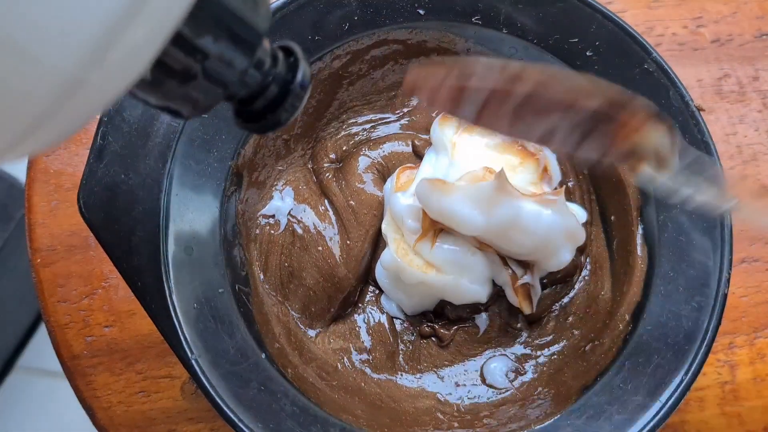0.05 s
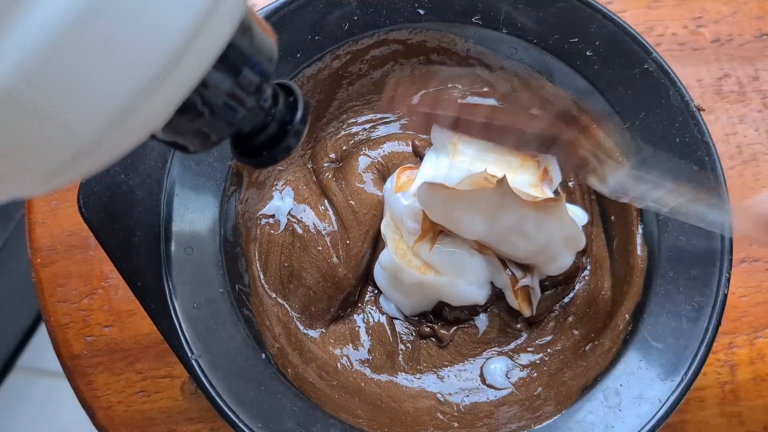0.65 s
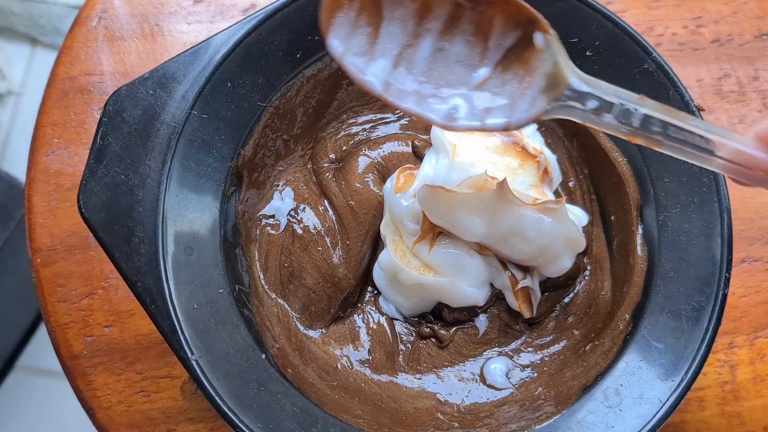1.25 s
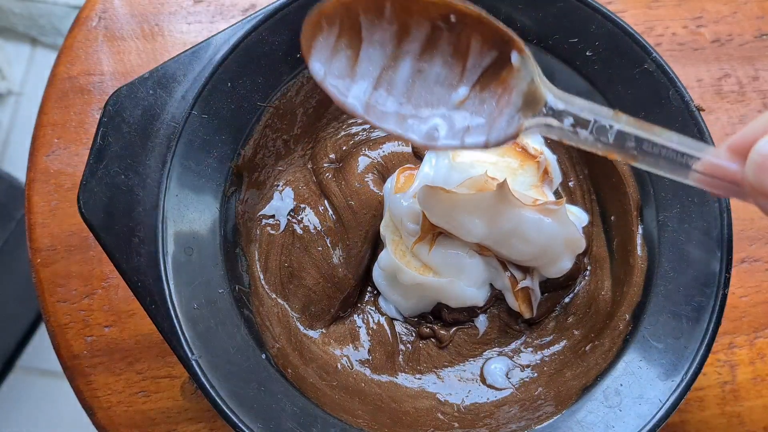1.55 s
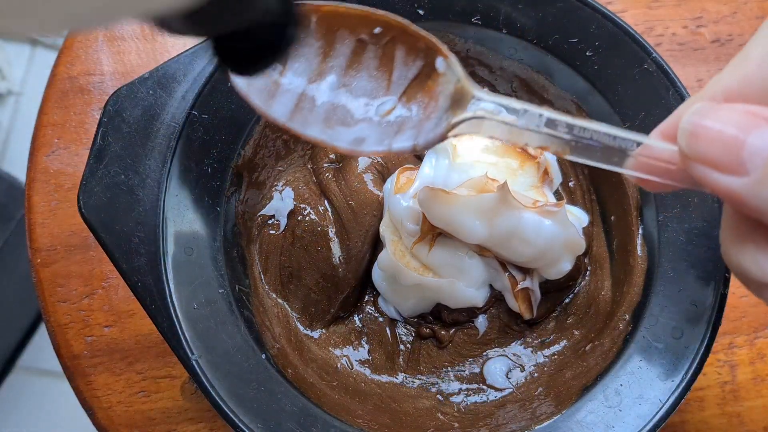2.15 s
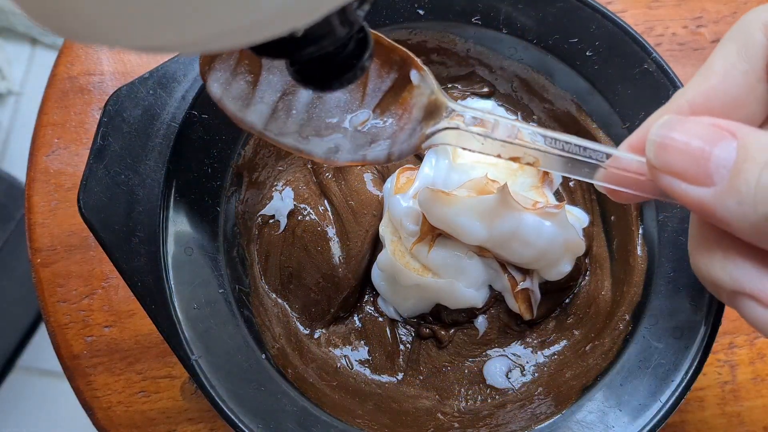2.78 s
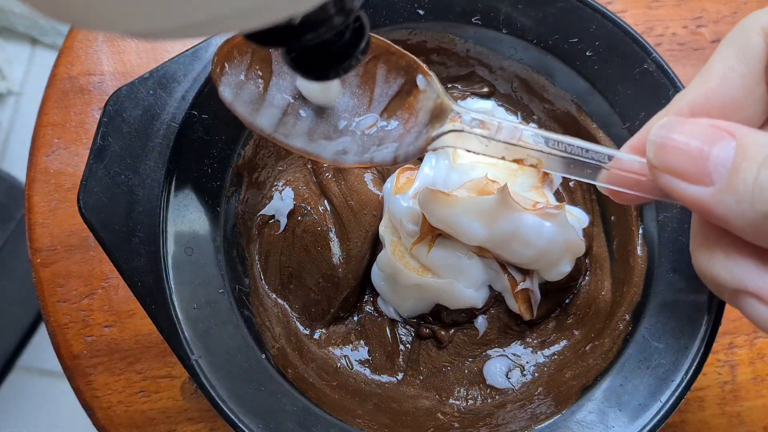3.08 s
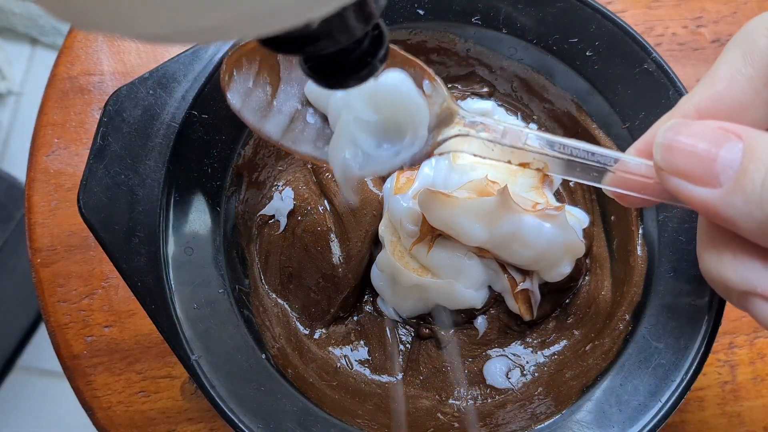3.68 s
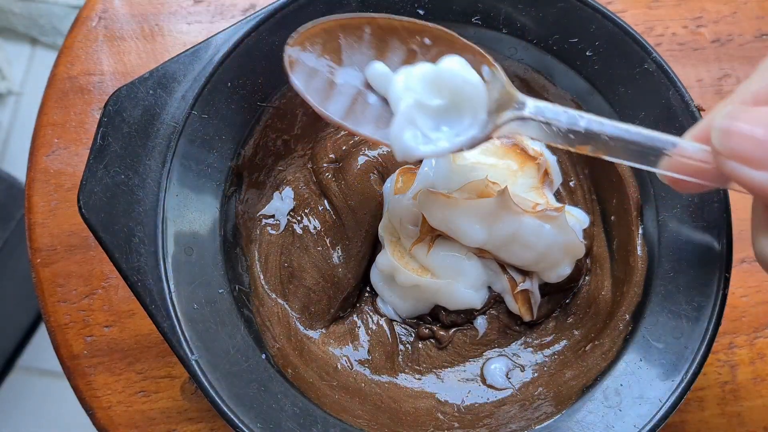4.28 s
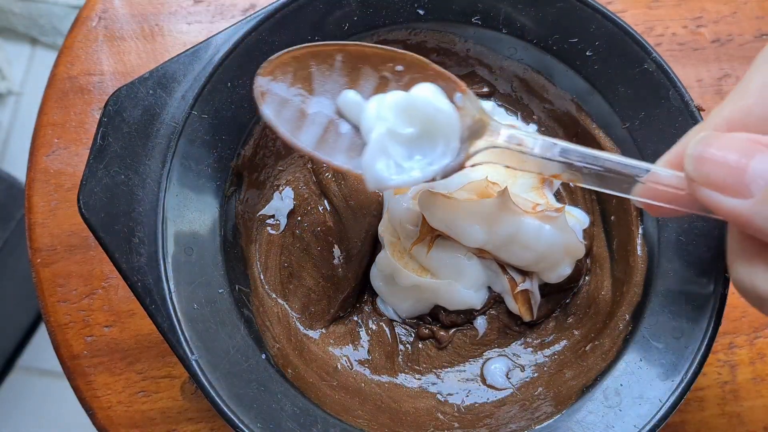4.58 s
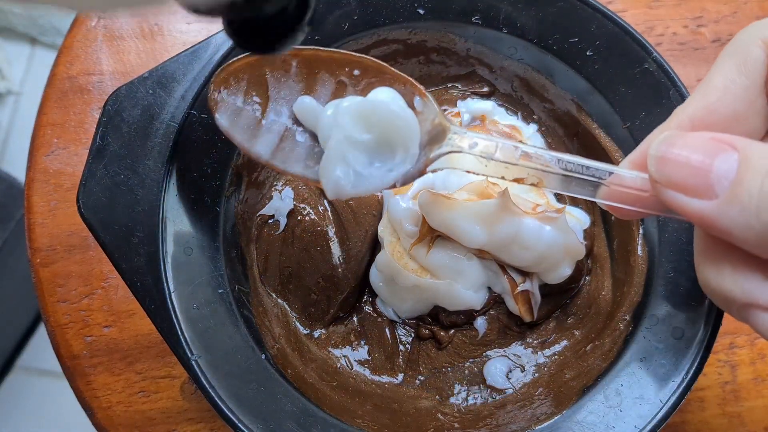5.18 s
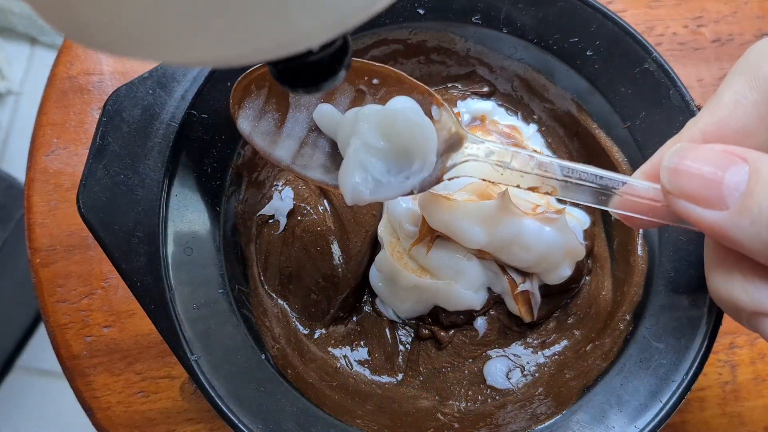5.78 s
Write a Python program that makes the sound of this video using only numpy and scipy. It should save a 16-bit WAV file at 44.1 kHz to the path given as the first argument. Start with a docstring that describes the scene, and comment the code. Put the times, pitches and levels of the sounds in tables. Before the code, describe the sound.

A plastic spoon clacks five times on a bowl, with soft low handling thumps. A nearly empty plastic bottle creaks as it is squeezed, fizzes briefly, then pops and splutters out air and cream. Released, it sucks air back in with a sinking whistle, and its dented wall snaps out. The microphones are close, in a small quiet room, with birds calling faintly outside.

```python
"""Five dry clacks of a plastic spoon on a bowl, then a nearly empty plastic bottle is squeezed over it.
The plastic creaks; the nozzle fizzes, pops and splutters air and cream, ringing the hollow bottle.
Let go, the bottle sucks air back in with a sinking whistle and its dented wall snaps out.
Soft handling thumps and wafts of air reach a close microphone pair in a small, quiet room,
and birds call faintly outside."""
import sys
import numpy as np
from scipy import signal
from scipy.fft import rfft, irfft
from scipy.io import wavfile
from scipy.ndimage import uniform_filter1d

SR = 44100
rng = np.random.default_rng(int(sys.argv[2]) if len(sys.argv) > 2 else 0)


def file_out(sig):
    """Save sig as 16-bit WAV at sys.argv[1]."""
    # one column per channel
    cols = np.atleast_2d(sig).T
    # limit, then scale
    lim = np.clip(cols, -1, 1)
    pcm = np.round(lim * 32767).astype(np.int16)
    wavfile.write(sys.argv[1], SR, pcm)


N = 261939
TIME, HZ = np.arange(N) / SR, np.fft.rfftfreq(N, 1 / SR)
RING = TIME[:SR // 5]  # time axis of one short hit, in seconds

# how alike rushing air is at the two microphones: freq_hz, correlation
AIR_LIKENESS = [(400, 0.68), (1500, 0.52), (4000, 0.343), (10000, 0.26)]


def spoon_taps(detune_spread=.02, contact_db=2.5, rebound_s=.0193):
    """Each tap is a dry clack that scatters around the bowl, knocks it and touches the rim again."""
    # taps on the rim: start_s, level_db, knock_db, rebound_relative_db
    taps = [(0.0444, -21, -28, -28), (0.2255, -22.5, -37.5, -17), (0.3992, -23.5, -39, -27),
            (0.5876, -25.5, -41, -15.5), (0.7544, -23.5, -38.5, -35)]
    # modes of the spoon: pitch_hz, gain_db, t60_s
    spoon_modes = [(1420, -4, .011), (1660, -1, .012), (1950, -10, .011), (2220, -18, 0.0068),
                   (2930, -17.5, 0.0098), (3300, -12, 0.011), (3880, -10, 0.0097), (5880, -9, 0.0097),
                   (7060, -12.5, .01), (7630, -12, 0.013), (11300, -21, 0.0077)]
    # low modes of the bowl: pitch_hz, gain_db, t60_s
    bowl_modes = [(371, -1, 0.057), (520, -14, .06), (860, -1, .035)]
    # the bowl rocks faintly on the table: start_s, level_db, pitch_hz
    rocks = [(0.071, -38, 1195), (0.78, -44.5, 1127)]
    out = np.zeros((2, N))
    attack = np.clip(RING / .00066, 0, 1)
    knock = np.clip(RING / .003, 0, 1) * ringing(bowl_modes)
    for start, db, knock_db, rebound_db in taps:
        detunes = 1 + detune_spread * rng.standard_normal(len(spoon_modes))
        trims = contact_db * rng.uniform(-.85, 1, len(spoon_modes))  # each tap lands on another spot
        modes = [(hz * detune, gain + trim, t60)
                 for (hz, gain, t60), detune, trim in zip(spoon_modes, detunes, trims)]
        ring = filtered(ringing(modes), 6, 1380, "high")  # so small a spoon radiates little bass
        scatter = amp(-26.5) * filtered(crack(t60=.093), 4, 8000, "low")
        add(out, start, amp(db) * attack * (ring + amp(-8) * crack(t60=.013) + scatter))
        add(out, start, amp(knock_db) * knock)
        add(out, start + rebound_s, amp(db + rebound_db) * (ring + amp(-12) * crack(t60=.025)))
    for start, db, hz in rocks:
        add(out, start, amp(db) * mode(hz, t60=.059))
    return pan(out, lead_ms=.423, left_db=3.5)


def cream_pops(cavity_db=-2):
    """Plugs of cream burst and ring the bottle: its air cavity, its wall and the narrow nozzle."""
    # bursting plugs: start_s, strength_db, crack_trim_db, nozzle_trim_db, wall_trim_db
    plugs = [(3.6428, -11.5, -9, -7, -1.5), (3.6439, -19, 0.5, -1, -4), (3.6462, -21.5, -7.5, -4, -1.5),
             (3.6502, -24, 8.5, -8.5, -3), (3.6535, -32, -5.5, 14, 0), (3.691, -17, -10, -14.5, -4),
             (3.696, -20.5, -6, -11.5, 2), (3.7004, -18.5, -3, -12, -1), (3.7098, -18.5, -0.5, -10, -2),
             (3.716, -14, -5.5, -12, -9), (3.7345, -25.5, -4, -12, -8), (3.7417, -24.5, -8, -14, -12),
             (3.9596, -36.5, -20, -34, -20)]
    # modes of the bottle: pitch_hz, gain_db, t60_s
    bottle_modes = [(400, -7, .03), (820, -7, .027), (1134, -2, 0.0199), (1430, -3, .028), (1837, -3, .035),
                    (2100, -2.5, 0.016), (2552, -4.5, .02), (3012, -3.5, .022), (4645, 0, .015)]
    out = np.zeros((2, N))
    for start, db, crack_db, nozzle_db, wall_db in plugs:
        tilt = [(420, cavity_db), (1100, 0), (2100, wall_db), (3000, wall_db), (4500, nozzle_db)]
        modes = [(hz, gain + curve_at(tilt, hz), t60) for hz, gain, t60 in bottle_modes]
        lip_squeak = amp(nozzle_db - 5) * mode(4600, t60=.016)
        ring = ringing(modes, polarity=-1) + lip_squeak
        add(out, start, amp(db) * (amp(-4) * ring + amp(crack_db - 5) * crack(t60=.0084)))
    escaping = filtered(out, 3, 330, "high")  # little escapes below the cavity's pitch
    return pan(escaping, lead_ms=.14, left_db=2)


def splutter(bursts_per_s=900, cream_full=.85, cream_left=.32, runs_out_s=3.717, drain_s=.014):
    """Films of cream burst in quick succession; as the cream runs out, hissing air takes over."""
    # spurts of cream and air: start_s, flow_db, attack_s, hold_s, fall_db_per_s
    spurts = [(3.639, -34, 0.004, 0.006, 450), (3.691, -22, 0.009, 0.015, 314)]
    flow = sum(amp(db) * surge(start, attack, hold, fall) for start, db, attack, hold, fall in spurts)
    cream_share = cream_left + (cream_full - cream_left) * settle(runs_out_s, drain_s)
    bursts = evened(impulses(bursts_per_s) * rng.uniform(.18, 1, N) * rng.choice([-1, 1], N))
    wet = np.sqrt(cream_share) * gurgle(bursts, clears_s=spurts[-1][0])
    air = np.sqrt(1 - cream_share) * amp(1) * air_jet(bursts)
    return pan(flow * (wet + air), lead_ms=.13, left_db=1)


def gurgle(bursts, clears_s, start_hz=2500, end_hz=450, sink_s=.031, foam=.45):
    """Bursts and foam ring the cavity over a low puff; a broad resonance sinks as the nozzle clears."""
    # resonances of nozzle, bottle and spoon: centre_hz, width_hz, gain_db
    cavity = [(420, 37, 7.5), (515, 45, -2), (640, 90, -9), (835, 55, 4), (1112, 60, 2), (1230, 60, -1),
              (1410, 110, 2), (1850, 130, 0), (2200, 130, -4), (3010, 200, -9), (3900, 300, -13)]
    drive = bursts + foam * noise_pair(AIR_LIKENESS)
    response = sum((-1) ** k * amp(db) * band(hz, width) for k, (hz, width, db) in enumerate(cavity))
    body = evened(irfft(rfft(drive) * response, N))
    sinking_hz = end_hz + (start_hz - end_hz) * settle(clears_s, sink_s)
    sweep = amp(-11.5) * whistle(drive, sinking_hz, width_hz=870)
    wet = filtered(body + sweep + amp(-7) * froth(), 4, 360, "high")
    puff = amp(-20) * whistle(drive, 155, width_hz=110)
    return evened(wet) + puff


def froth(sizes=16, bubbles_per_s=450, ring_cycles=20, rise=.15):
    """Bubbles of many sizes break, each with a short rising ring."""
    out = np.zeros(N)
    for hz in np.geomspace(1250, 2600, sizes):
        t60 = ring_cycles / hz
        blip = np.sin(2 * np.pi * hz * RING * (1 + rise * RING / t60)) * dying(t60)
        breaks = impulses(bubbles_per_s / sizes) * rng.uniform(-1, 1, N)
        out += signal.oaconvolve(breaks, blip)[:N]
    return evened(out)


def air_jet(bursts, spits_per_s=260):
    """Air flutters out of the nozzle, crackling with larger droplets."""
    # tone of the escaping air: freq_hz, gain_db
    jet_spectrum = [(250, -29), (450, -4), (900, -2.5), (1600, -10.5), (2600, 0), (3700, -4), (5000, 1),
                    (6600, .5), (8200, -5), (12500, -3.5), (16000, -11)]
    # resonances of the nozzle: centre_hz, width_hz, gain_db
    nozzle_peaks = [(3080, 120, 0), (4560, 350, 0), (5500, 60, 2), (6260, 40, 3), (7000, 40, 3),
                    (8229, 40, 3), (14272, 50, 3)]
    flutter = amp(2 * wobble(120))
    spits = evened(impulses(spits_per_s) * rng.standard_normal(N))
    air = noise_pair(AIR_LIKENESS) * flutter + amp(-4) * spits + .4 * bursts
    return colour(bowl_echoes(air, strength=.5), jet_spectrum, nozzle_peaks)


def wall_snap(creep_s=4.447, snap_s=4.4796, slips_per_s=1200, growth_db_per_s=200):
    """The dent creeps, then buckles out with a hollow knock, a dry crack and a brief shiver."""
    # modes of the plastic wall: pitch_hz, gain_db, t60_s
    wall_modes = [(860, -10, 0.01), (1136, -1.5, .018), (1620, -3.5, 0.017), (2050, -4.5, 0.03),
                  (2990, 6, 0.017), (3700, 1.5, 0.016), (3980, 2, 0.027), (4460, 5, .012),
                  (4960, 2.5, 0.017), (5820, -2.5, 0.017), (6700, -10.5, 0.014)]
    # modes of the bottle's hollow body: pitch_hz, gain_db, t60_s
    hollow_modes = [(431, -3.5, 0.084), (1704, -26, 0.2)]
    out = np.zeros((2, N))
    wall = ringing(wall_modes, polarity=-1)
    t = np.arange(0, snap_s - creep_s, 1 / SR)
    slips = impulses(slips_per_s, len(t)) * rng.uniform(-1.3, 1, len(t)) * amp(growth_db_per_s * t)
    creep = signal.fftconvolve(.5 * wall + crack(t60=.0047), slips[None], axes=1)
    add(out, creep_s, amp(-60) * filtered(creep, 3, 7000, "low"))
    add(out, snap_s, amp(-25) * (wall + ringing(hollow_modes)))
    add(out, snap_s + .001233, amp(-26) * crack(t60=.019))
    shiver = filtered(crack(t60=.17), 2, 7500, "low")
    add(out, snap_s, amp(-38) * shiver)
    return pan(out, lead_ms=.12, left_db=3)


def refill(start_s=3.908, attack_s=.079, hold_s=.031, seal_s=4.197, closing_s=.021,
           start_hz=4500, end_hz=3380, sag_s=.065, films_per_s=420):
    """The bottle sucks air through fizzing cream; flow and whistle sink until cream seals the nozzle."""
    # tone of the indrawn air: freq_hz, gain_db
    intake_spectrum = [(200, -24), (420, -3.5), (700, -12.5), (1400, -4.5), (1900, -10), (2380, -32),
                       (2700, -11), (3100, -2.5), (4800, -3), (6200, -3), (8500, -2.5), (12000, -9.5),
                       (16000, -12.5)]
    # resonances in the indrawn air: centre_hz, width_hz, gain_db
    intake_peaks = [(453, 70, 1), (790, 80, 7.5), (2570, 30, 9.5), (3390, 46, 5), (3890, 120, 6),
                    (4420, 120, 7), (4950, 45, 3), (5480, 68, 5), (6640, 60, 2), (8100, 50, -4),
                    (8700, 50, -3)]
    gap = np.clip(1 - (TIME - seal_s) / closing_s, 0, 1)
    flow = gap * surge(start_s, attack_s, hold_s, fall_db_per_s=93, bend=1.67)
    pitch_hz = end_hz + (start_hz - end_hz) * settle(start_s + attack_s + hold_s, sag_s)
    air = wet_stream(flow, intake_spectrum, intake_peaks, pitch_hz, whistle_db=-5.5, width_hz=300)
    films = impulses(films_per_s) * rng.uniform(-.92, 1, N)
    fizz = evened(filtered(bowl_echoes([films, films], strength=.4), 2, [5500, 14000], "band"))
    suction = amp(-46) * (air + amp(-11) * flow * fizz)
    narrowing = amp(-63) * gap * swell(4.135, half_s=.088)
    thin_whistle = narrowing * whistle(noise_pair(AIR_LIKENESS), 5500, width_hz=170)
    return pan(suction + thin_whistle, lead_ms=.1, left_db=2.5)


def first_leak(start_s=2.612, attack_s=.022, hold_s=.033, start_hz=2480, rise_hz_per_s=5800):
    """The first squeeze fizzes; a whistle climbs with the pressure and the nozzle's lip sings."""
    # tone of the leaking air: freq_hz, gain_db
    leak_spectrum = [(500, -24), (1000, -4.5), (1700, 2), (2800, 3), (3700, -3), (5500, -3), (7200, -3),
                     (8500, -13.5), (12000, -9), (16000, -23)]
    # resonance in the leaking air: centre_hz, width_hz, gain_db
    leak_peaks = [(5300, 280, -1)]
    seep = amp(-18) * swell(2.635, half_s=.045)
    flow = surge(start_s, attack_s, hold_s, fall_db_per_s=1700) + seep
    pitch_hz = start_hz + rise_hz_per_s * np.clip(TIME - start_s, 0, attack_s + hold_s)
    air = wet_stream(flow, leak_spectrum, leak_peaks, pitch_hz, whistle_db=-13, width_hz=260)
    lip = amp(-3.5) * flow * whistle(noise_pair(AIR_LIKENESS), 4660, width_hz=300)
    return pan(amp(-50.5) * (air + lip), lead_ms=.385, left_db=1)


def wet_stream(flow, spectrum, peaks, pitch_hz, whistle_db, width_hz, spits_per_s=350):
    """Air flutters and spits through the wet nozzle: fixed resonances under a sliding whistle."""
    bubbling = amp(2 * wobble(300))
    spits = evened(impulses(spits_per_s) * rng.uniform(-1, 1, N))
    air = (noise_pair(AIR_LIKENESS) + .55 * spits) * bubbling
    hiss = colour(bowl_echoes(air, strength=.57), spectrum, peaks)
    wander = 1 + .023 * wobble(900)  # cream in the gap makes the pitch stray
    tone = amp(whistle_db) * whistle(air, pitch_hz * wander, width_hz)
    return flow * hiss + flow ** .6 * tone  # the whistle fades more slowly than the hiss


def last_air():
    """As the squeeze ends, the emptied nozzle whistles briefly."""
    return amp(-51) * swell(3.803, half_s=.028) * whistle(noise_pair(AIR_LIKENESS), 3700, width_hz=330)


def creaks(slips_per_s=900):
    """Squeezed plastic creaks in short clusters of tiny slips, muffled by the fingers."""
    # creaks of the wall: start_s, level_db, pitch_hz, crack_trim_db
    clusters = [(1.514, -46, 2080, -5), (1.638, -56, 1950, -12), (2.735, -63, 1590, -2),
                (2.962, -57, 1960, -5), (4.246, -52.5, 1940, -7), (4.275, -56.5, 2800, 2),
                (4.36, -55.5, 2060, 1), (4.399, -59, 2100, -3), (4.447, -57, 2930, -2),
                (4.6, -53.5, 2100, -2), (4.6144, -57.5, 2160, -4), (4.6685, -57, 2080, 1),
                (4.705, -57, 1940, 6.5), (4.719, -59.5, 1950, 6), (4.795, -60, 2050, -7.5),
                (4.829, -62, 2290, -1)]
    out = np.zeros((2, N))
    for start, db, hz, crack_db in clusters:
        slips = crackle(slips_per_s, strength=.6, t60=.11)
        tick = mode(hz, t60=.009) + amp(crack_db + 3) * crack(t60=.006)
        add(out, start, amp(db) * signal.fftconvolve(tick, slips, axes=1))
    return pan(filtered(out, 4, 6200, "low"), lead_ms=.12, left_db=1)


def cream_ticks(films_per_s=500, t60=.016):
    """Tiny bubbles break in the cream as it oozes out."""
    # wet ticks at the nozzle: start_s, level_db, bubble_hz, bubble_relative_db
    ticks = [(3.242, -64, 1800, -4), (3.3555, -55, 1770, -1.5), (3.37, -55, 1800, -6),
             (3.3865, -49, 4650, -2), (3.5498, -52.5, 1640, -9)]
    out = np.zeros((2, N))
    for start, db, hz, bubble_db in ticks:
        smack = filtered(rng.standard_normal((2, len(RING))) * dying(t60), 2, [1405, 6300], "band")
        films = crackle(films_per_s, strength=.5, t60=.12)
        smacks = signal.fftconvolve(smack, films, axes=1)[:, :len(RING)]
        add(out, start, amp(db) * (smacks + amp(bubble_db) * mode(hz, t60)))
    return out


def handling_thumps():
    """Handling gives soft, low pushes of a few cycles at most."""
    # thumps: middle_s, level_db, pitch_hz, half_length_s, left_over_right_db
    thumps = [(0.42, -44, 62, 0.03, 16.5), (0.668, -33, 55, 0.015, -14), (0.689, -28.5, 52.3, .015, 3),
              (0.7597, -24, 62.4, .022, 0), (0.789, -27.5, 71.7, .011, -9), (0.809, -26, 65, .015, -3),
              (0.879, -36.5, 62, .013, 17), (1.639, -44.5, 46.3, 0.029, -18.5),
              (2.086, -46.5, 75, 0.013, 13), (2.288, -38, 44, 0.023, 15.5), (2.344, -40.5, 64, .014, -15.5),
              (4.188, -36, 86, 0.0069, 9), (5.044, -46, 70, 0.013, 17)]
    out = np.zeros((2, N))
    for middle, db, hz, half, left_db in thumps:
        push = np.cos(2 * np.pi * hz * (TIME - middle)) * swell(middle, half)
        out += amp([[db + left_db / 2], [db - left_db / 2]]) * push
    return out


def air_wafts():
    """Moving air buffets each microphone almost independently."""
    # wafts: middle_s, level_db, half_length_s
    wafts = [(0.782, -35.5, 0.1), (1.2, -51, 0.34), (2.31, -47.5, 0.25)]
    # tone of the buffeting: freq_hz, gain_db
    buffet_spectrum = [(15, -8.5), (35, -7.5), (49, -6.5), (61, -1), (80, -4.5), (120, -23.5), (250, -44),
                       (600, -80)]
    draught = sum(amp(db) * swell(middle, half) for middle, db, half in wafts)
    return draught * colour(noise_pair(likeness=[(30, .072), (200, .21)]), buffet_spectrum)


def grip_rustle():
    """Fingers slide softly over the plastic as the grip shifts."""
    # tone of skin on plastic: freq_hz, gain_db
    rustle_spectrum = [(500, -19), (1400, 7), (2200, -3), (3300, 2.5), (4700, -3), (6000, -20), (9000, -20),
                       (16000, -14)]
    grain = amp(2 * wobble(700))
    friction = colour(noise_pair(AIR_LIKENESS) * grain, rustle_spectrum)
    return amp(-74.5) * swell(1.5, half_s=.99) * friction


def birds():
    """Far-off birds outside: drooping whistles, rising chirps and dull hoots."""
    # whistled notes: start_s, pitch_hz, level_db
    notes = [(1.33, 3590, -75), (1.52, 3150, -73), (1.63, 3000, -78), (1.96, 2764, -70), (2.08, 3110, -73),
             (5.37, 3620, -76)]
    # chirps of another bird: start_s, pitch_hz, level_db
    chirps = [(4.76, 5420, -82), (4.94, 4840, -78.5), (5.19, 4960, -84), (5.27, 5550, -83)]
    # hoots: start_s, pitch_hz, level_db
    hoots = [(5.21, 509.4, -56.5), (5.84, 499.4, -56.5)]
    return (far_calls(notes, length_s=.14, glide=-.03, octave_db=-47, waver=.027)
            + far_calls(chirps, length_s=.14, glide=.1, octave_db=-42, waver=.017)
            + far_calls(hoots, length_s=.048, glide=.042, octave_db=-6, waver=.033))


def far_calls(calls, length_s, glide, octave_db, waver):
    """Soft calls heard only through their reflections; glide and waver are shares of the pitch."""
    # decay of the reflections outside: freq_hz, t60_s
    yard_decay = [(300, .6), (6000, .6)]
    out, count = np.zeros((2, N)), int(length_s * SR)
    slide = 1 + glide * np.linspace(-.5, .5, count)
    envelope = np.sqrt(2 * np.hanning(count))
    for start, hz, db in calls:
        unsteady = 1 + waver * wobble(200, SR)[:count]
        phase = 2 * np.pi * np.cumsum(hz * slide * unsteady) / SR
        add(out, start, amp(db) * envelope * (np.sin(phase) + amp(octave_db) * np.sin(2 * phase)))
    return reverb(out, yard_decay)


def room_tone():
    """Steady rumble of the room with a few broad humps, and the microphones' own hiss."""
    # tone of the rumble: freq_hz, gain_db
    rumble_spectrum = [(20, -11.5), (70, 3), (110, -5), (175, -7.5), (250, -16), (420, -13.5), (600, -24),
                       (830, -20.5), (1200, -29), (2300, -35.5), (4500, -38.5), (7200, -43.5),
                       (8400, -58.5), (15500, -52.5)]
    # how alike the room is at the two microphones: freq_hz, correlation
    room_likeness = [(60, 0.85), (150, 0.92), (380, 0.96), (950, 0.22), (2380, -0.16), (5980, 0.17),
                     (15000, -0.83)]
    # broad resonances of the room: centre_hz, width_hz, level_db
    room_modes = [(432, 107, -69.5), (3085, 1900, -81.5), (6696, 410, -86)]
    rumble = amp(-55) * colour(noise_pair(room_likeness), rumble_spectrum)
    air = noise_pair(room_likeness)
    humps = sum(amp(db) * whistle(air, hz, width) for hz, width, db in room_modes)
    mic_hiss = amp(-85) * rng.standard_normal((2, N))
    return rumble + humps + mic_hiss


def bowl_echoes(pair, strength, count=8):
    """Reflections off bowl, bottle and table within a few ms comb the hiss, differently on each side."""
    delays = rng.integers(SR // 2000, SR // 140, (2, count))
    return np.array([side + strength * sum(np.roll(side, delay) for delay in row)
                     for side, row in zip(pair, delays)])


def reverb(x, decay, predelay_s=.0023, echoes_per_s=4000):
    """Sparse reflections, each band dying at its own speed."""
    shape = (2, SR // 2)
    echoes = rng.choice([-1., 1.], shape) * impulses(echoes_per_s, shape) * (TIME[:SR // 2] > predelay_s)
    hz, t, bands = signal.stft(echoes, SR, nperseg=256)
    fade = np.exp(-np.log(1000) * t / curve_at(decay, hz)[:, None])
    tail = signal.istft(bands * fade, SR, nperseg=256)[1]
    return signal.fftconvolve(x, tail / np.linalg.norm(tail[0]), axes=1)[:, :N]


def pan(pair, lead_ms, left_db):
    """A source on the left reaches that microphone sooner and louder."""
    lag_s = np.array([[-.5], [.5]]) * lead_ms / 1000
    delayed = irfft(rfft(pair) * np.exp(-2j * np.pi * HZ * lag_s), N)
    return delayed * amp([[left_db / 2], [-left_db / 2]])


def ringing(modes, polarity=1):
    """A struck body, the sum of its modes; polarity -1 flips every other one."""
    return sum(polarity ** k * amp(db) * mode(hz, t60) for k, (hz, db, t60) in enumerate(modes))


def mode(hz, t60):
    """One dying sine."""
    return np.sin(2 * np.pi * hz * RING) * dying(t60)


def crack(t60):
    """A burst of dense high modes, different at each microphone."""
    return filtered(rng.standard_normal((2, len(RING))) * dying(t60), 2, [2000, 14000], "band")


def crackle(per_s, strength, t60):
    """One full click and a dying trail of weaker ones."""
    clicks = impulses(per_s, len(RING)) * rng.uniform(-strength, strength, len(RING)) * dying(t60)
    clicks[0] = 1
    return clicks[None]


def whistle(air, hz, width_hz):
    """Noise rings a resonance twice over: a fuzzy tone of unit level whose pitch can slide."""
    turn = np.exp(2j * np.pi * np.cumsum(hz * np.ones(N)) / SR)
    pole = np.exp(-np.pi * width_hz / SR)
    for _ in range(2):
        air = 2 * (turn * signal.lfilter([1 - pole], [1, -pole], air / turn + 1e-18)).real
    return evened(air)


def noise_pair(likeness):
    """White noise at two microphones, partly alike."""
    left, other = rfft(rng.standard_normal((2, N)))
    alike = np.clip(curve_at(likeness, HZ), -1, 1)
    return irfft(np.array([left, alike * left + np.sqrt(1 - alike ** 2) * other]), N)


def impulses(per_s, shape=N):
    """Clicks at random moments."""
    return rng.random(shape) < per_s / SR


def wobble(smooth_samples, count=N):
    """A random drift of unit level."""
    return evened(uniform_filter1d(rng.standard_normal(count), size=smooth_samples))


def surge(start_s, attack_s, hold_s, fall_db_per_s, bend=1):
    """Flow builds, holds and dies as the pressure is spent; more bend softens the start."""
    t = TIME - start_s
    return np.clip(t / attack_s, 0, 1) ** bend * amp(-fall_db_per_s * np.maximum(t - attack_s - hold_s, 0))


def swell(middle_s, half_s):
    """A smooth rise and fall."""
    return np.exp(-((TIME - middle_s) / half_s) ** 2)


def settle(start_s, time_constant_s):
    """Holds at 1, then eases towards 0."""
    return np.exp(-np.maximum(TIME - start_s, 0) / time_constant_s)


def dying(t60):
    """An envelope that loses 60 dB in t60 seconds."""
    return np.exp(-np.log(1000) * RING / t60)


def colour(x, spectrum, peaks=()):
    """Shapes a sound by a spectrum and any narrow peaks on top, at unit level."""
    resonant = 1 + sum(amp(db) * band(hz, width) for hz, width, db in peaks)
    return evened(irfft(rfft(x) * amp(curve_at(spectrum, HZ)) * resonant, N))


def band(hz, width_hz):
    """Frequency response of a fixed resonance of gain 1."""
    return 1j * HZ * width_hz / (hz ** 2 - HZ ** 2 + 1j * HZ * width_hz)


def filtered(x, order, edge_hz, kind):
    """A low-, high- or band-pass filter."""
    return signal.sosfilt(signal.butter(order, edge_hz, kind, fs=SR, output="sos"), x)


def curve_at(points, hz):
    """Reads a curve along a log frequency axis."""
    freqs, values = np.transpose(points)
    return np.interp(np.log(hz + 1), np.log(freqs + 1), values)


def amp(db):
    """Decibels to gain."""
    return 10 ** (np.asarray(db) / 20)


def evened(x):
    """Scales to unit RMS level."""
    return x / np.sqrt(np.mean(x ** 2) + 1e-20)


def add(mix, start_s, sound):
    """Lays a sound into the mix."""
    part = mix[..., max(round(start_s * SR), 0):][..., :sound.shape[-1]]
    part += sound[..., :part.shape[-1]]


def scene():
    """Spoon and bottle close by, their short room echo, and the quiet background."""
    # decay of the small room: freq_hz, t60_s
    room_decay = [(250, 0.16), (700, 0.23), (1800, 0.16), (4500, 0.2), (12000, 0.15)]
    bottle = cream_pops() + splutter() + last_air() + creaks() + cream_ticks() + first_leak() + refill()
    snap = wall_snap()
    taps = spoon_taps()
    echo = reverb(amp(-14) * taps + amp(-16.5) * bottle + amp(-19) * snap, room_decay)
    movement = handling_thumps() + air_wafts() + grip_rustle()
    return taps + bottle + snap + echo + movement + room_tone() + birds()


def record(dry):
    """A steep low-pass takes off the very top of the treble."""
    low_pass = signal.firwin(511, 16200, window=("kaiser", 9), fs=SR)
    return signal.oaconvolve(dry, low_pass[None], "same")


dry = scene()
out = record(dry)
file_out(out)
```